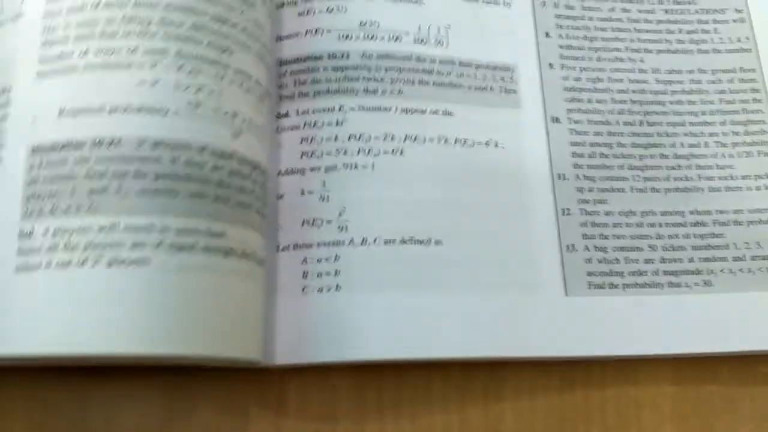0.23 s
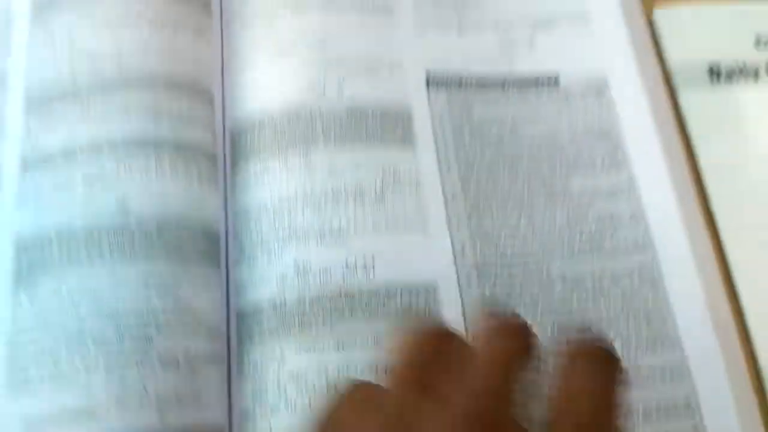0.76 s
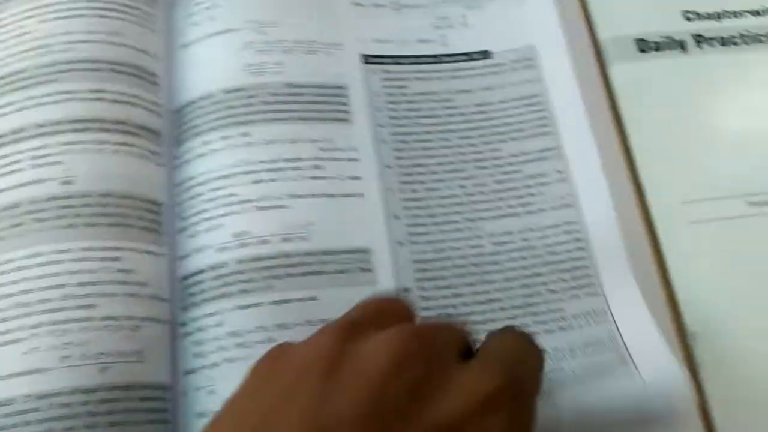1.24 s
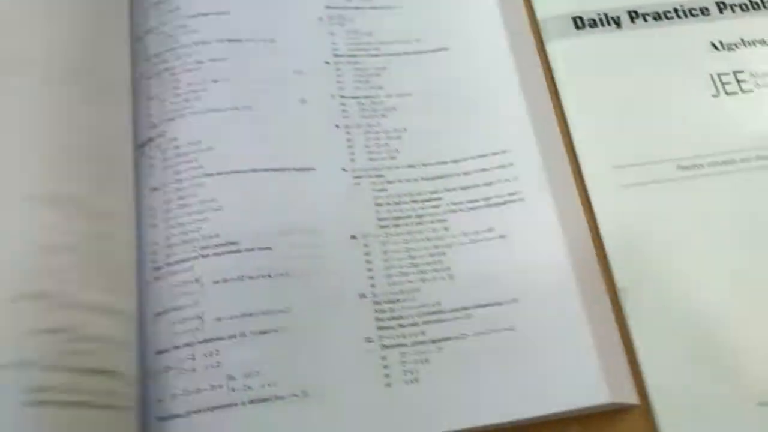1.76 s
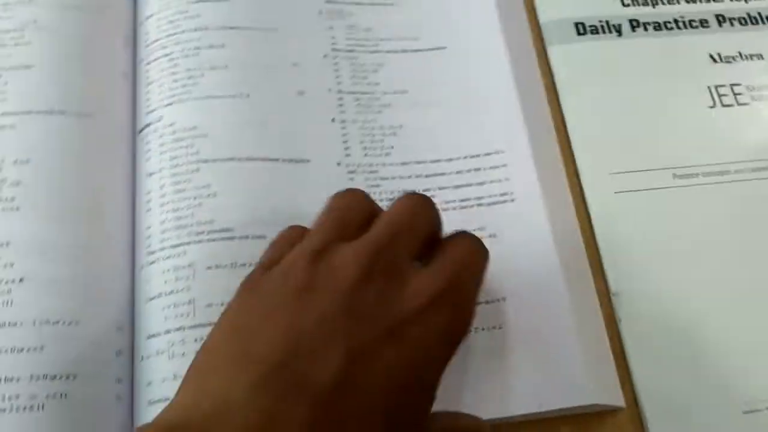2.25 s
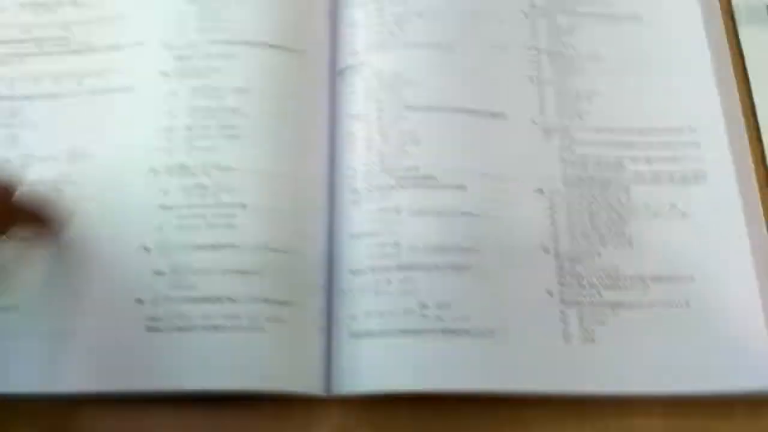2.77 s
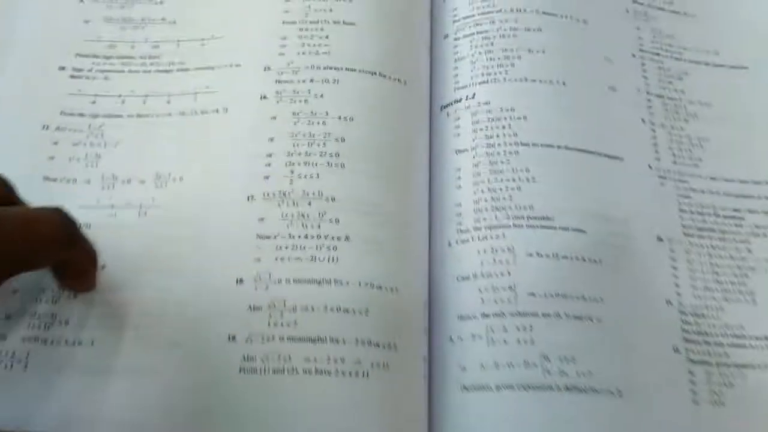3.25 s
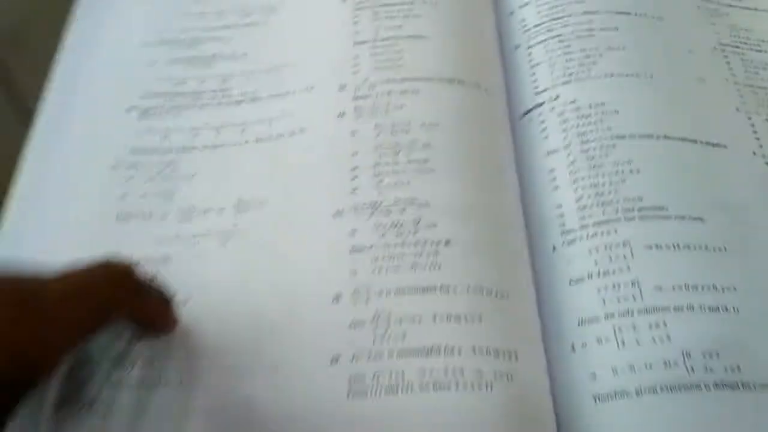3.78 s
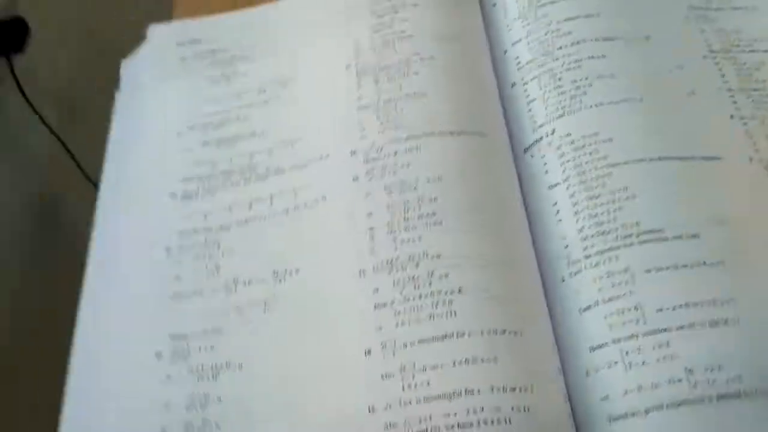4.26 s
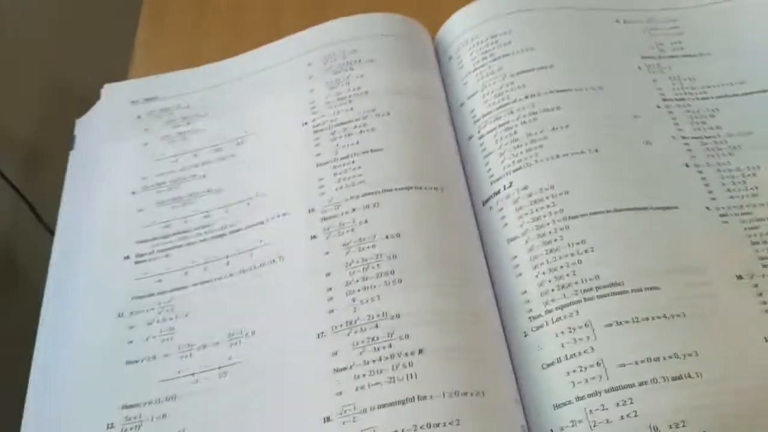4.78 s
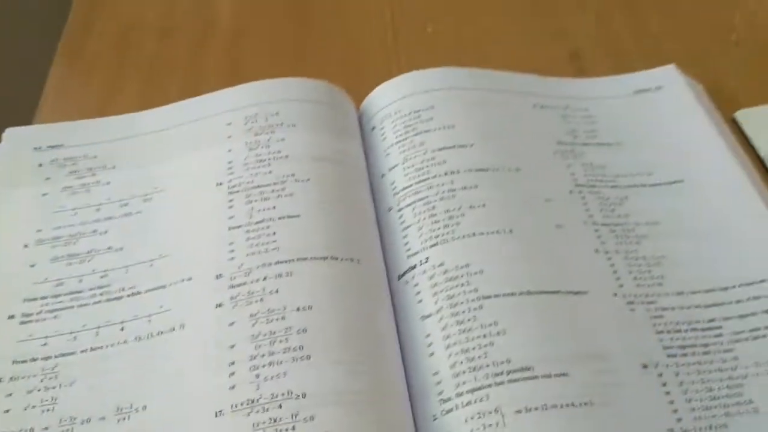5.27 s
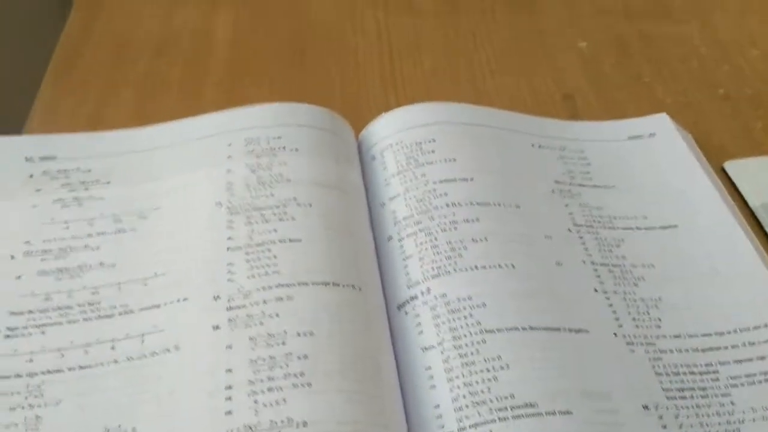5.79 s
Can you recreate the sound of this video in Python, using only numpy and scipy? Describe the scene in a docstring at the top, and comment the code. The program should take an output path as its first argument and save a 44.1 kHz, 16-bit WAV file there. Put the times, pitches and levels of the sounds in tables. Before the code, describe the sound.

Close paper handling: sliding sheets, soft low thumps of hand and pages, then sparse hard crease snaps that briefly overload the microphone.

```python
"""The pages of a thick book, turned by hand on a wooden table, close to a phone in a quiet small room.
Paper slides with a hiss and sheets rustle as they bend: streams of tiny random clicks, coloured by filters.
Creases snap in short crackling bursts; hand and pages land as low puffs of noise; a fingertip squeaks.
Sparse reflections answer from the room over a faint noise and hum, and the loudest peaks overload the microphone.
"""
import sys
import numpy as np
from scipy import signal
from scipy.io import wavfile
from scipy.ndimage import uniform_filter1d

SR = 44100
rng = np.random.default_rng(int(sys.argv[2]) if len(sys.argv) > 2 else 0)


def transcribe(u):
    """Save the signal u as a 16-bit wav file named by the first command-line argument.

    u: samples, shape (n,) or (channels, n), limited to [-1, 1]; the rate is SR.
    q: integer samples, one column per channel.
    """
    v = np.clip(np.atleast_2d(u).T, -1, 1)
    q = np.round(v * 32767).astype(np.int16)
    wavfile.write(sys.argv[1], SR, q)


N = 265598  # samples

# Levels are those of the dry sources, ahead of the room and the microphone. Spectra give only a colour.

# A sheet or finger slides over paper. Each row: start in seconds, length in seconds, level in dB,
# change over the stroke in dB, dullness 0-1.
SLIDE_STROKES = [(-.02, 0.26, -39, 1, 0.38), (.26, 0.21, -43, -20, 0.44), (.39, 0.18, -42.5, -6, 0.37),
                 (.58, 0.31, -51, -14, 0.44), (.878, 0.16, -50, -12.5, 0.03), (1.14, 0.071, -56.5, -8, 0),
                 (1.22, 0.033, -55.5, -14, 0.25), (1.28, 0.25, -35, -26, 0.38),
                 (1.80, 0.055, -70, 17.5, 0.56), (1.865, 0.19, -53, -14, 0.46),
                 (2.003, 0.23, -45.5, -39, 0.4), (2.248, 0.15, -43.5, -14, 0.41),
                 (2.40, 0.065, -48.5, 13.5, 0.31), (2.52, 0.056, -62.5, 2.5, 0),
                 (2.917, 0.28, -49, -8, 0.49), (3.24, 0.34, -58, -6.5, 0.64), (3.49, 0.093, -52, 6.5, 0.45),
                 (3.60, 0.44, -52.5, 4, 0.48), (3.88, 0.2, -32, -40.5, 0.33),
                 (4.06, 0.097, -48.5, -6, 0.31), (4.16, 0.12, -48.5, -2.5, 0.43),
                 (4.30, 0.13, -53.5, 0, 0.57), (4.41, 0.032, -47.5, 0, 0.3),
                 (4.815, 0.11, -50.5, -1.5, 0.46), (5.00, 0.28, -51.5, -3.5, 0.32),
                 (5.366, 0.042, -28.5, -13.5, 0.37), (5.42, 0.19, -55, 19, 0.18),
                 (5.535, 0.16, -38.5, -10, 0), (5.72, 0.15, -43.5, 12, 0.28), (5.88, 0.097, -42, -15, 0.1),
                 (5.95, 0.069, -49.5, 13.5, 0.32)]
# A sheet bends against the block of pages. Each row: start in seconds, length in seconds, level in dB,
# change over the stroke in dB, rumble of the block in dB relative to the bend.
BEND_STROKES = [(-.02, 0.3, -42.5, 1.5, -15.5), (.27, 0.11, -45, -7, -9.5), (.385, 0.53, -53.5, -3, -6),
                (.6, 0.09, -51.5, 4, -9.5), (.74, 0.16, -62, 3.5, -62), (.885, 0.19, -63, -8, -14),
                (1.13, 0.078, -66.5, -3.5, -9), (1.22, 0.042, -57, -1.5, -5), (1.27, 0.1, -55, -4.5, -10),
                (1.39, 0.11, -74.5, -20, 8), (1.80, 0.095, -77.5, 8.5, -4), (1.92, 0.27, -74, -12, 13.5),
                (1.997, 0.27, -49, -35.5, 7.5), (2.248, 0.16, -62.5, -21.5, 9.5), (2.41, 0.14, -64, -9, -6),
                (2.52, 0.087, -74, -10.5, 7.5), (2.62, 0.17, -79.5, -0.5, -3), (2.917, 0.27, -69, 9.5, -1),
                (3.08, 0.12, -57.5, -16, 1), (3.22, 0.24, -68.5, -5, -2), (3.488, 0.044, -54, -11, -3),
                (3.575, 0.27, -50.5, -1.5, -9.5), (3.88, 0.24, -48, -22, -8.5),
                (4.13, 0.067, -57, -7.5, -1.5), (4.22, 0.06, -55, 1.5, -1), (4.31, 0.19, -59, 11, -3.5),
                (4.75, 0.14, -72.5, 13, -4.5), (5.00, 0.2, -68.5, 2.5, -8.5),
                (5.22, 0.19, -63.5, -10, -6.5), (5.364, 0.064, -37.5, -19.5, -3.5),
                (5.44, 0.094, -56.5, -5, -2), (5.54, 0.16, -61, -4, -4.5), (5.70, 0.23, -55.5, -8, -7),
                (5.95, 0.086, -71, 19, -4)]
# The palm rubs the book low down. Each row: start in seconds, length in seconds, level in dB,
# change over the stroke in dB.
PALM_STROKES = [(.43, 0.13, -56.5, 9), (.55, 0.19, -50, -30), (2.02, 0.15, -54.5, -35),
                (2.29, 0.24, -61, -14), (3.08, 0.12, -57.5, -13), (3.40, 0.11, -70, 6),
                (3.52, 0.27, -63, -10), (3.85, 0.075, -49, -12), (4.135, 0.086, -57, -19),
                (4.26, 0.23, -66, 18), (5.38, 0.2, -58, -21), (5.71, 0.17, -60, -15)]
# Every stroke: rise in seconds, fall after its end in dB per second, exponent (above 1: change comes late).
ATTACK_S, RELEASE_DB_PER_S, CHANGE_EXPONENT = 0.012, 399, 1.46

# Colours of a bright slide, a dull slide, the bending sheet, the broad rumble of the page block and
# the rubbing palm. Each row: frequency in Hz, relative density in dB per Hz.
BRIGHT_SLIDE_COLOUR = [(2060, -60), (3500, -31.5), (4060, -28.5), (6540, -20), (7540, -16), (11400, -4),
                       (15800, -13.5), (16400, -33)]
DULL_SLIDE_COLOUR = [(2060, -32), (3500, -5.5), (4390, -7.5), (8690, 2.5), (9890, -14.5), (10800, -26.5),
                     (16400, -31)]
BEND_COLOUR = [(600, -26), (1000, -19), (1600, -8), (2200, -2), (2700, -3), (3300, -4.5), (4100, -12.5),
               (5500, -17), (7000, -34)]
BLOCK_COLOUR = [(50, -28.5), (200, -12.5), (430, 1), (800, -5.5), (1400, -3.5), (2200, -22.5), (3300, -46)]
PALM_COLOUR = [(40, -25), (90, -1.5), (180, -2), (300, -2), (420, -23.5)]

# Main pitch of the bent sheet. Each row: time in seconds, pitch in Hz, gain of the ringing in dB.
SHEET_PITCH = [(0, 3000, -48), (.56, 2310, -10), (0.66, 2440, 6.5), (1.0, 2650, -5), (1.26, 2820, -0.5),
               (1.3, 2760, 15), (1.93, 2990, 6.5), (2.03, 2040, 7), (2.601, 2260, -4), (2.8, 2360, 12.5),
               (3.3, 2400, -22), (3.65, 2080, 3), (3.85, 2050, -1.5), (4.9, 1816, 1), (5.3, 2740, -13),
               (6.02, 2360, 10)]
SHEET_WIDTH_HZ, SHEET_WAVER = 188, 0.026  # waver: rms fraction of the pitch
# A page glides low over the next. Each row: time in seconds, strength of the close reflection 0-1.
LOW_GLIDE = [(.5, 0), (.62, 0.34), (.9, 0), (1.1, 0)]
# Higher ringing of the arched pages. Each row: frequency in Hz, width in Hz, gain in dB.
ARCH_RESONANCES = [(4543, 546, 1.5), (6790, 190, -1.5)]
# From this time the arched pages sound a hollow note instead of a broad rumble.
HOLLOW_FROM_S, HOLLOW_DB = 3.3, -1

# Creases popping. Each row: start in seconds, treble level in dB, middle in dB relative to the treble,
# low part in dB relative to the treble, length in milliseconds.
CREASE_SNAPS = [(0.231, -39, -5, -32, 2.2), (0.5271, -34.5, -0.5, -17, 1.4), (1.007, -50.5, -30, -30, 3.4),
                (1.149, -33.5, -30.5, -47, 0.88), (1.16, -40.5, -16, -21.5, 0.94),
                (1.178, -49.5, -13.5, -37.5, 9.4), (1.226, -39.5, -10, -34, 17),
                (1.2375, -30.5, -7, -22, 6.3), (1.2518, -28.5, -5, -16.5, 2.2), (1.2758, -30, -8, -35, 1.6),
                (1.284, -33.5, -11, -40, 8.3), (1.296, -38, -13, -26, 3.1), (1.302, -36, -9, -25, 1.2),
                (1.8457, -45.5, -5, -44, 0.83), (1.8668, -26, -34, -50, 0.53), (1.869, -32, -34, -50, 0.55),
                (1.9221, -40, -4, -22, 1.7), (1.928, -40.5, 11, 1, 1.3), (1.9347, -43, 17, -8, 1.3),
                (2.014, -47.5, 12, 5, 2.8), (2.048, -51, 16, -5, 2.8), (2.058, -55, 7, 20.5, 7.1),
                (2.488, -31.5, -20, -40, 6), (3.5, -45.5, 2, -13, 3.5), (3.5365, -21, 8.5, -12.5, 0.39),
                (3.5723, -45, 4.5, -5, 10.5), (3.6063, -26, -0.5, -27, 5.5), (3.6173, -31, -1, -20, 7.9),
                (3.635, -43, 6, -14.5, 4.8), (3.655, -50.5, 11.5, -12.5, 11), (3.682, -50, 10, -8, 2),
                (3.697, -46, -3, -22.5, 2.8), (3.706, -40, 10.5, -12.5, 1.4), (3.7191, -40.5, 5, -12, 6.3),
                (3.7257, -48, 11, -6.5, 4.9), (3.758, -53, 12, -6.5, 3.1), (3.775, -53, 10.5, -10.5, 1.6),
                (3.83, -7, -10, -32, 8.1), (4.108, -35, -33, -23, 1.1), (4.132, -46, -5, -18, 1.6),
                (4.164, -56, 6, -1, 4.2), (4.179, -54, 5, -1, 1.3), (4.2642, -36, -9.5, -7, 3.2),
                (4.343, -48, 6, -2, 4.5), (4.402, -38.5, -1.5, -19.5, 14.4), (4.4628, -14.5, -15, -17, 5.6),
                (4.4713, -17, -14, -29, 2.2), (4.48, -6.5, -8.5, -23, 1.64),
                (4.818, -46.5, -5.5, -20.5, 4.4), (4.8451, -37, 2.5, -3.5, 0.7),
                (4.8623, -47, -5, -12, 6.6), (4.88, -38.5, -12, -33.5, 1.4),
                (4.9208, -26.5, -25.5, -23, 1.8), (4.9293, -11, -13, -22.5, 2.83),
                (5.058, -41, 8.5, -15, 0.71), (5.0738, -43.5, 6.5, -2.5, 2.7), (5.368, -27.5, -7, 1, 2.7),
                (5.3731, -22.5, -17, -30, 1.13), (5.3803, -21, -14, -26, 1.3), (5.437, -38, -1.5, -27, 3.8),
                (5.4553, -34.5, -5, -15, 3.9), (5.5204, -43, -0.5, -9, 3.1), (5.701, -29, -14.5, -21, 5.7),
                (5.7074, -22, -11, -33, 2.9), (5.852, -25.5, -16.5, -56, 3.4)]
CREASE_RISE_S = 0.00078  # a crease lets go at once
# Treble of a snap, then its low part, which is the book's hollow note.
# Each row: frequency in Hz, relative density in dB per Hz.
CRACK_COLOUR = [(2240, -48.5), (3800, -16.5), (4370, -20.5), (5690, -12.5), (8600, -12), (12300, -1.5),
                (15700, -11.5), (16400, -27.5)]
HOLLOW_COLOUR = [(450, -26.5), (650, -8), (820, 1), (1050, -3.5), (1800, -28)]

# Hand and pages landing on the book. Each row: time in seconds (the puff starts 9 ms later),
# relative level in dB, centre in Hz.
LANDINGS = [(0.426, -28, 462), (0.518, -21, 218), (0.525, -28, 75.6), (0.669, -37, 142), (0.87, -44, 358),
            (0.999, -52.5, 236), (1.455, -55, 420), (1.888, -42.5, 620), (2.049, -33, 323),
            (2.275, -32.5, 327), (2.289, -38.5, 65), (2.409, -48, 112), (3.075, -38.5, 110),
            (3.482, -31.5, 132), (3.575, -33, 157), (3.821, -30, 152), (3.867, -32, 110), (3.967, -37, 96),
            (4.149, -37, 107), (4.25, -38, 142), (4.331, -45, 61.9), (4.396, -38, 130), (4.467, -40.5, 102),
            (5.36, -25.5, 167), (5.443, -29, 134), (5.69, -32.5, 215)]
# A fingertip squeaks on the page. Each row: time in seconds, pitch in Hz, level in dB.
FINGER_SQUEAK = [(1.887, 12700, -55), (1.92, 13700, -61), (1.945, 14100, -62), (1.964, 14300, -62),
                 (1.997, 12000, -68.5)]
# Decay of the small room. Each row: frequency in Hz, time to fall by 60 dB in seconds.
ROOM_DECAY = [(250, 0.3), (700, 0.077), (1800, 0.31), (4600, 0.32), (12000, 0.22)]
# Colour of the quiet background. Each row: frequency in Hz, relative density in dB per Hz.
QUIET_COLOUR = [(30, -18.5), (50, -5.5), (75, -20), (240, -21.5), (340, -30), (480, -19.5), (640, -31.5),
                (2400, -35), (12000, -33), (16400, -36.5)]
QUIET_DB = -73
EDGE_HZ = 16000  # upper band limit of the microphone


def rustle():
    """Slips excite the sliding surfaces, the bending sheet and the block of pages."""
    t = np.arange(N) / SR
    slide, dull = strokes(SLIDE_STROKES)
    bend, block_db = strokes(BEND_STROKES)
    fine = slips(per_s=32000, spread_db=2.0, clump_db=1.0)
    coarse = slips(per_s=8000, spread_db=1.5, clump_db=0.5)
    hiss = (1 - dull) * colour(fine, BRIGHT_SLIDE_COLOUR) + dull * colour(fine, DULL_SLIDE_COLOUR)
    flex = close_reflection(sheet(coarse))

    rumble = bend * amp(block_db) * coarse
    arched = t > HOLLOW_FROM_S
    pages = colour(rumble * ~arched, BLOCK_COLOUR)
    pages += amp(HOLLOW_DB) * colour(rumble * arched, HOLLOW_COLOUR)
    return ticks(slide) + arch_ring(slide * hiss) + bend * flex + pages + palm_rub()


def slips(per_s, spread_db, clump_db):
    """Fibres catch and let go: random clicks of uneven size that come in clumps."""
    clumps = evened(smoothed_twice(rng.standard_normal(N), 150))
    size_db = spread_db * np.minimum(rng.exponential(1, N), 5) + clump_db * clumps
    clicks = rng.standard_normal(N) * (rng.random(N) < per_s / SR)
    return evened(amp(size_db) * clicks)


def stroke(length, db, change_db):
    """A hand movement rises quickly, swells or fades over its length, then lets go."""
    t = np.arange(0, length + 0.2, 1 / SR)
    course_db = change_db * np.minimum(t / length, 1) ** CHANGE_EXPONENT
    course_db -= RELEASE_DB_PER_S * np.maximum(t - length, 0)
    return np.minimum(t / ATTACK_S, 1) * amp(db + course_db)


def strokes(rows):
    """Strokes add in power to one envelope; their last column is averaged by who sounds."""
    lead = 0.1  # seconds of room for strokes already under way at the start
    power, weighted = np.zeros(N + SR), np.zeros(N + SR)
    for row in rows:
        part = stroke(*row[1:4]) ** 2
        add(power, row[0] + lead, part)
        add(weighted, row[0] + lead, row[-1] * part)
    heard = slice(round(lead * SR), round(lead * SR) + N)
    return np.sqrt(power[heard]), weighted[heard] / (power[heard] + 1e-30)


def sheet(x):
    """Bending stiffness colours the paper and lets one wavering main pitch ring."""
    t = np.arange(N) / SR
    s, hz, ring_db = np.transpose(SHEET_PITCH)
    flex = colour(x, BEND_COLOUR)
    waver = evened(smoothed_twice(rng.standard_normal(N), 900))
    ring = resonate(flex, np.interp(t, s, hz) * (1 + SHEET_WAVER * waver), SHEET_WIDTH_HZ)
    return flex + amp(np.interp(t, s, ring_db)) * ring


def close_reflection(flex):
    """A page gliding low over the next one combs the sound with a close, delayed copy."""
    t = np.arange(N) / SR
    low = np.interp(t, *np.transpose(LOW_GLIDE))
    delay = 3 / np.interp(t, *np.transpose(SHEET_PITCH)[:2])  # three periods of the sheet's pitch
    return (flex + low * np.interp(t - delay, t, flex)) / np.sqrt(1 + low ** 2)


def arch_ring(x):
    """The arched pages add their high resonances to what excites them."""
    arched = x * (np.arange(N) / SR > HOLLOW_FROM_S)
    rings = [amp(db) * resonate(arched, np.full(N, hz), width_hz)
             for hz, width_hz, db in ARCH_RESONANCES]
    return x + sum(rings)


def ticks(effort):
    """Small creases pop at random as the sheet slides: decaying sines at eight fixed pitches."""
    out, t = np.zeros(N), np.arange(200) / SR
    for hz in np.geomspace(5500, 14000, num=8):
        pops = rng.random(N) < 5.0 / SR  # five per second at each pitch
        size = amp(1.1 * np.minimum(rng.exponential(1, N), 4)) * pops
        ping = np.sin(2 * np.pi * hz * t) * np.exp(-t / 0.0015)
        out += signal.oaconvolve(size * effort, ping)[:N]
    return amp(-1.0) * out


def palm_rub():
    """Sparse, strongly clumped slips under the palm sound low in the book."""
    rub = slips(per_s=1100, spread_db=-1.0, clump_db=3.5)
    return strokes(PALM_STROKES)[0] * colour(rub, PALM_COLOUR)


def snaps():
    """A crease gives way in a few ms of crackle, then the sheet settles."""
    drive, t = np.zeros((3, N)), np.arange(2000) / SR  # treble, middle, low
    crackle = rng.standard_normal((len(CREASE_SNAPS), len(t)))
    # fibres tear in uneven spurts about a millisecond long
    spurts = uniform_filter1d(rng.standard_normal(crackle.shape), size=40, axis=1)
    crackle = crackle * amp(1.7 * evened(spurts))
    for (s, db, middle_db, low_db, ms), burst in zip(CREASE_SNAPS, crackle):
        length = ms / 1000
        settling = 0.19 * np.exp(-t / (4.24 * length))
        shape = (1 - np.exp(-t / CREASE_RISE_S)) * (np.exp(-(t / length) ** 4) + settling)
        # chance does not change the strength of a burst
        burst = burst * np.linalg.norm(shape ** 2) / np.linalg.norm(shape ** 2 * burst)
        for part, rel_db in zip(drive, (0, middle_db, low_db)):
            add(part, s, amp(db + rel_db) * shape * burst)
    treble, middle, low = drive
    return arch_ring(colour(treble, CRACK_COLOUR)) + sheet(middle) + colour(low, HOLLOW_COLOUR)


def flexed(x, patchy_db):
    """The sheet's resonances drift as it changes shape: random patches of colour."""
    z = signal.stft(x, nperseg=256)[2]
    patches = rng.standard_normal(z.T.shape)
    for axis, size in ((0, 20), (0, 20), (1, 4), (1, 3)):  # axis 0 is time, axis 1 frequency
        patches = uniform_filter1d(patches, size=size, axis=axis)
    return signal.istft(z * amp(patchy_db * evened(patches).T), nperseg=256)[1][:N]


def thumps():
    """A soft blow: a short blunt puff of low rumble around its centre pitch."""
    out, t = np.zeros(N), np.arange(8000) / SR
    shape = (1 - np.exp(-t / 0.0013)) * amp(-60 * t / 0.092)
    for s, db, hz in LANDINGS:
        air = rng.standard_normal(len(t)) * shape
        wide = signal.butter(1, [0.81 * hz, 1.4 * hz], "bandpass", fs=SR)
        limits = signal.butter(2, [45, 1.8 * hz], "bandpass", fs=SR)
        puff = signal.lfilter(*limits, signal.lfilter(*wide, air))
        loudness = np.sqrt(np.mean(puff[:1500] ** 2))  # over the first 34 ms
        add(out, s + 0.009, amp(db - 17.5) * puff / loudness)
    return out


def squeak():
    """Skin on paper gives a thin gliding whistle, slightly unsteady."""
    s, hz, db = np.transpose(FINGER_SQUEAK)
    t = np.arange(s[0], s[-1], 1 / SR)
    waver = 1 + 0.06 * uniform_filter1d(rng.standard_normal(len(t)), size=60)
    phase = 2 * np.pi * np.cumsum(np.interp(t, s, hz) * waver) / SR
    tone = np.sqrt(2) * np.sin(phase)
    out = np.zeros(N)
    add(out, s[0], amp(np.interp(t, s, db)) * tone * signal.windows.tukey(len(t), 0.2))
    return out


def room(x):
    """Sparse reflections of random sign, each band dying at its own speed."""
    taps = np.zeros(SR // 2)
    at = np.arange(260, len(taps) - 10, 10)  # the first arrives after 6 ms
    taps[at + rng.integers(0, 10, len(at))] = rng.choice([-1.0, 1.0], len(at))
    hz, t, z = signal.stft(taps, SR, nperseg=256)
    decay = amp(-60 * t / read(ROOM_DECAY, hz)[:, None])
    tail = signal.istft(z * decay, SR, nperseg=256)[1]
    return signal.oaconvolve(x, tail / np.linalg.norm(tail))[:N]


def background():
    """Steady coloured noise with a faint low hum under it."""
    return amp(QUIET_DB) * colour(rng.standard_normal(N), QUIET_COLOUR) + hum(hz=260, db=-84.0)


def hum(hz, db):
    """A sine at a fixed pitch whose strength slowly comes and goes."""
    drift = evened(smoothed_twice(rng.standard_normal(N), 5000))
    return amp(db) * drift * np.sin(2 * np.pi * hz * np.arange(N) / SR)


def amp(db):
    """Gain of a level in dB."""
    return 10 ** (np.asarray(db) / 20)


def evened(x):
    """Scales to rms 1."""
    return x / np.sqrt(np.mean(x ** 2) + 1e-20)


def smoothed_twice(x, size):
    """Two running means leave a slow, rounded drift."""
    return uniform_filter1d(uniform_filter1d(x, size=size), size=size)


def read(points, hz):
    """Value of a table on a log-frequency axis."""
    f, value = np.transpose(points)
    return np.interp(np.log(hz + 1), np.log(f + 1), value)


def colour(x, spectrum):
    """Causal minimum-phase filter that keeps the power of white noise; 40 dB down outside the table."""
    hz = np.fft.rfftfreq(8192, 1 / SR)
    outside = (hz < spectrum[0][0]) | (hz > spectrum[-1][0])
    level_db = uniform_filter1d(read(spectrum, hz) - 40 * outside, size=3)
    log_gain = np.log(amp(level_db))
    circle = np.r_[log_gain, log_gain[-2:0:-1]]
    taps = np.fft.ifft(np.exp(np.conj(signal.hilbert(circle)))).real[:4096]
    return signal.oaconvolve(x, taps / np.linalg.norm(taps))[:len(x)]


def resonate(x, hz, width_hz):
    """A moving resonance: shift down, smooth, shift back."""
    turn = np.exp(2j * np.pi * np.cumsum(hz) / SR)
    r = np.exp(-np.pi * width_hz / SR)
    return 2 * (turn * signal.lfilter([1 - r], [1, -r], x / turn)).real


def add(mix, s, sound):
    """Mixes a sound in at time s."""
    part = mix[round(s * SR):][:len(sound)]
    part += sound[:len(part)]


def scene():
    """Book close by, the room's answer and the faint steady background."""
    pops = flexed(snaps(), patchy_db=3.0)
    rest = flexed(rustle(), patchy_db=0.57) + thumps() + squeak()
    answer = room(amp(-10.0) * pops + amp(-13.5) * rest)
    return (pops + rest + answer + background())[None]


def record(dry):
    """A noise suppressor lowers faint bands and tails; the microphone overloads; its band is limited."""
    z = signal.stft(dry, nperseg=256)[2]
    power = uniform_filter1d(uniform_filter1d(abs(z) ** 2, size=9, axis=1), size=3, axis=2)
    kept = np.maximum(power / (power + amp(-81.5) ** 2), amp(-10.5))  # lowers by 10.5 dB at most
    clean = signal.istft(z * kept, nperseg=256)[1][:, :N]
    overloaded = np.clip(clean, -0.8, 0.8)
    taps = signal.firwin(301, EDGE_HZ, window=("kaiser", 8), fs=SR)
    return signal.oaconvolve(overloaded, taps[None], "same")


dry = scene()
out = record(dry)
transcribe(out)
```